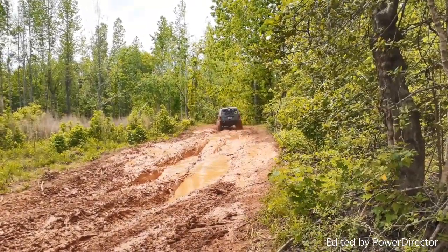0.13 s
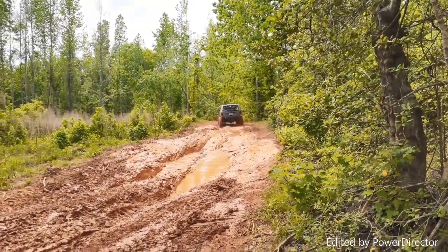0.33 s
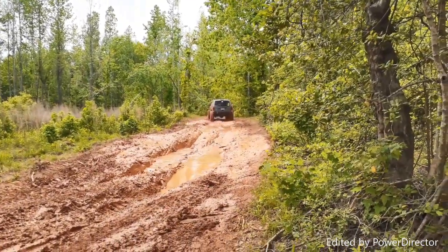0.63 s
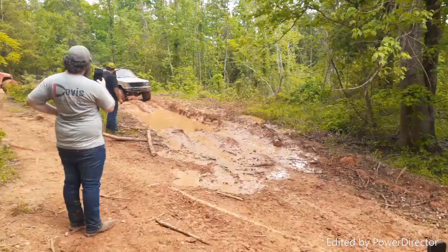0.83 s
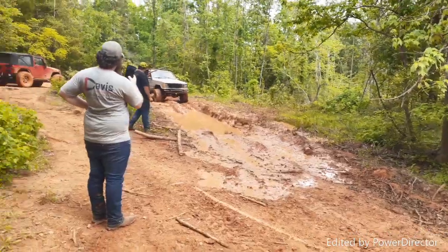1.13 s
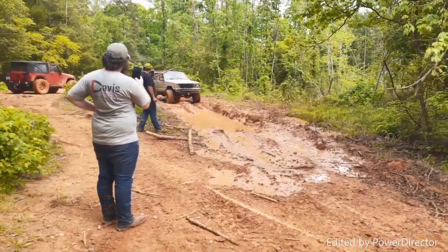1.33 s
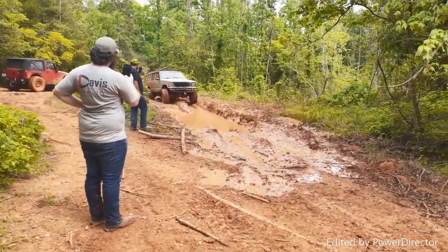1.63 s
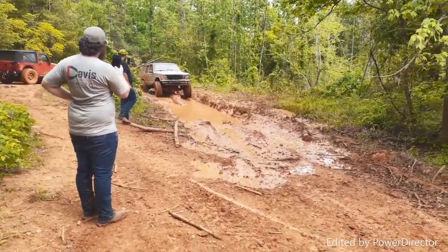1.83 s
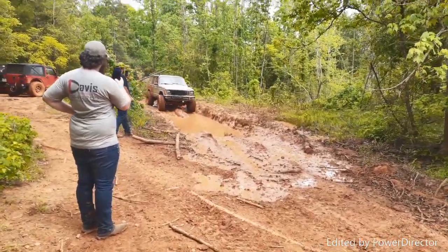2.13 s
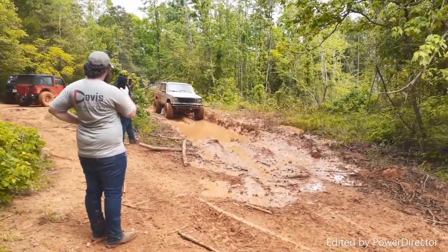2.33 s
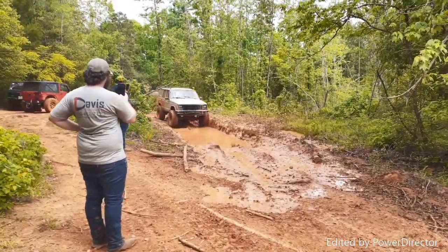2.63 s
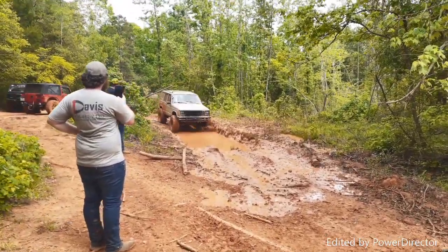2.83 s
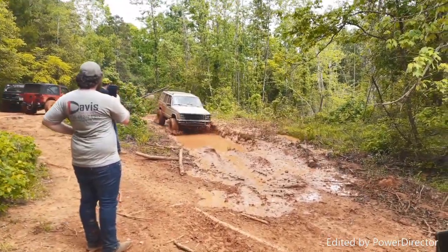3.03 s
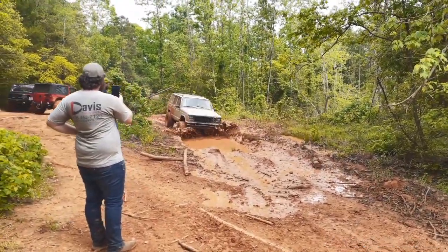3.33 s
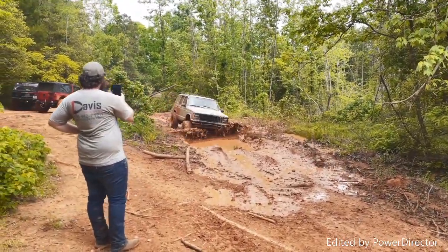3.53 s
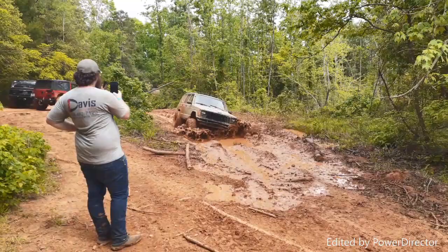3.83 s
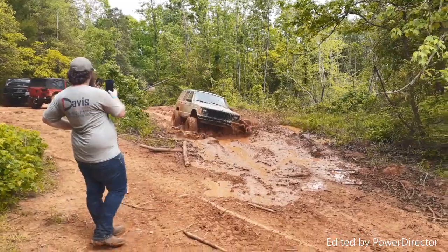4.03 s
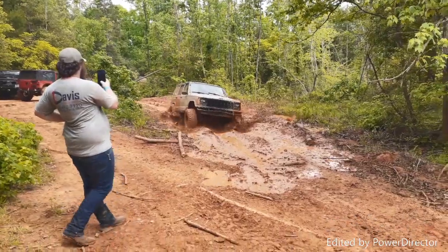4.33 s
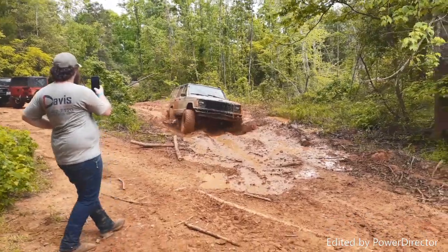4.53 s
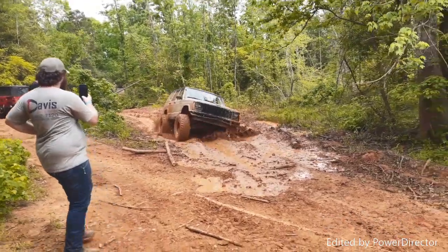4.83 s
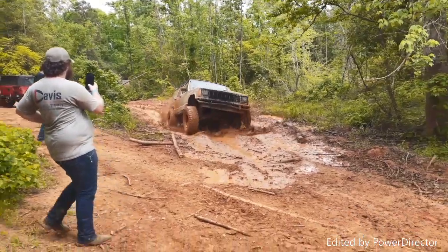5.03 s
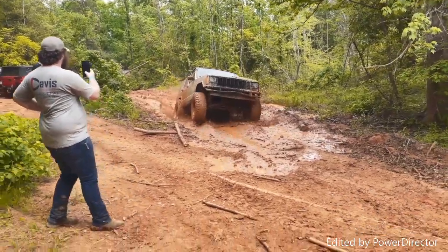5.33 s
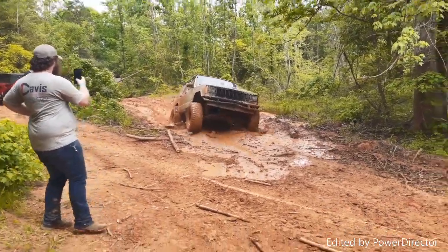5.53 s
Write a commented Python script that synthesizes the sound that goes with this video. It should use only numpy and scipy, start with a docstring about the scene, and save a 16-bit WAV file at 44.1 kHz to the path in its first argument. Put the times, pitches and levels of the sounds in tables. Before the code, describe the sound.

A distant off-road vehicle drones briefly, then after a short silence a nearby six-cylinder engine rumbles low, revs hard through wet mud and lets off.

```python
"""A far-off four-wheel drive grumbles on a forest track: a wavering drone, a dull roar and a thin hiss. The
sound cuts off for a moment and the scene changes: now it is near, rolls at low revs into a mud hole, revs up,
holds, surges and lets off. The exhaust is built from harmonics of the firing rate plus a burble of six unequal
cylinders. The engine bay roars and howls in puffs of noise at each firing; the tyres spray and squeeze wet mud."""
import sys
import numpy as np
from scipy import signal
from scipy.fft import rfft, irfft, next_fast_len
from scipy.io import wavfile
from scipy.ndimage import uniform_filter1d, map_coordinates

SR = 44100
rng = np.random.default_rng(int(sys.argv[2]) if len(sys.argv) > 2 else 0)


def to_wav(s):
    """Save 16-bit WAV."""
    ch = np.atleast_2d(s).T  # columns
    pcm = np.round(np.clip(ch, -1, 1) * 32767)  # PCM
    wavfile.write(sys.argv[1], SR, pcm.astype(np.int16))


N = 250488
TIME = np.arange(N) / SR


def amp(db):
    """Decibels to gain."""
    return 10 ** (np.asarray(db) / 20)


def unit(x):
    """Scale to rms 1."""
    return x / np.sqrt(np.mean(x ** 2) + 1e-20)


def along(points, hz):
    """Read (f/Hz, value) points on a log frequency axis."""
    f, value = np.transpose(points)
    return np.interp(np.log(hz + 1), np.log(f + 1), value)


def curves(rows):
    """One value per sample for each column after the time."""
    s, *columns = np.transpose(rows)
    return [np.interp(TIME, s, column) for column in columns]


def wobble(rate):
    """A smooth random curve, rate knots a second."""
    knots = rng.standard_normal(int(N * rate / SR) + 4)
    return map_coordinates(knots, [TIME * rate])


def filtered(x, response):
    """x times a complex response of frequency."""
    m = next_fast_len(N + SR // 2)
    hz = np.fft.rfftfreq(m, 1 / SR)
    return irfft(rfft(x, m) * response(hz), m)[..., :N]


def turbulence(patchy_db):
    """Rushing gas or water: two noises with patches of random gain in time and frequency; rms 1."""
    z = signal.stft(rng.standard_normal((2, N)), nperseg=512)[2]
    field = rng.standard_normal(z.shape[1:])
    field = uniform_filter1d(field, size=4, axis=0)
    field = uniform_filter1d(field, size=12, axis=1)
    noise = signal.istft(z * amp(patchy_db * unit(field)), nperseg=512)[1]
    return unit(noise[:, :N])


# left-right likeness, bass alike and treble apart: f/Hz, correlation [0 to 1]
STEREO_LIKENESS = [(100, .99), (500, 0.89), (1000, 0.78), (2000, 0.68), (4000, 0.34), (14000, 0.19)]


def spread(pair, colour):
    """Colour two unrelated signals and blend them to stereo: bass alike, treble apart; rms 1."""
    def mid_side(hz):
        turn = np.arccos(np.clip(along(STEREO_LIKENESS, hz), -1, 1)) / 2
        return amp(along(colour, hz)) * np.array([np.cos(turn), np.sin(turn)])
    mid, side = filtered(pair, mid_side)
    return unit(np.array([mid + side, mid - side]))


# one row per cylinder in firing order: excess strength of its exhaust pulse [ratio], clatter level/dB
CYLINDERS = [(0.35, 4), (-0.32, 5), (0.55, 3.9), (0.38, 3.5), (-0.019, 5.7), (-0.47, 5.5)]
PUFF_DB = 5.5  # how far the gas noise sinks between two firings


def puffs(firings):
    """A gain that jumps at each firing and sinks until the next, different for each cylinder; rms 1."""
    cylinder = firings.astype(int) % len(CYLINDERS)
    clatter_db = np.transpose(CYLINDERS)[1][cylinder]
    return unit(amp(clatter_db - PUFF_DB * (firings % 1)))


def uneven_pulses(firings, firing_hz, scatter):
    """How far each exhaust pulse departs from the mean: a pattern of six cylinders plus chance."""
    at = np.flatnonzero(np.diff(np.floor(firings)))
    excess = np.transpose(CYLINDERS)[0]
    pattern = np.resize(excess - excess.mean(), len(at))
    chance = scatter * rng.standard_normal(N // 100)[:len(at)]
    pulses = np.zeros(N)
    pulses[at] = pattern + chance
    return pulses / np.sqrt(firing_hz)


# the distant vehicle before the layer trims: t/s, rumble level/dB, roar level/dB, hiss level/dB
FAR_LEVELS = [(0.0, -35, -38, -43.5), (0.214, -37.5, -39, -46.5), (0.61, -36, -38.5, -53.5)]
# colours of its rumble and its roar: f/Hz, level/dB
FAR_RUMBLE = [(20, -29), (38, -11), (62, -8), (85, 2.5), (115, -4), (200, -6.5), (290, -7), (400, -20.5),
              (700, -51.5)]
FAR_ROAR = [(200, -8), (420, 2.5), (640, 7), (860, -4.5), (1060, 5), (1350, -4), (1600, -1), (2700, -6.5),
            (3500, -13), (6000, -19.5), (10000, -54)]
# colour of the hiss, shared with the near mud spray: f/Hz, level/dB
SPRAY = [(1000, 2), (3000, 1), (5000, -0.5), (7200, -2.5), (8500, 1.5), (10000, 0), (12300, 1.5),
         (14000, -2.5), (15800, -6.5)]


def distant_vehicle(drone_hz=73, surge_s=0.574):
    """Far off, the firings smear into a wavering drone, a rumble and a dull roar under a thin hiss."""
    rumble_db, roar_db, hiss_db = curves(FAR_LEVELS)
    firings = np.cumsum(drone_hz * (1 + 0.05 * wobble(8))) / SR
    # a brief dab of throttle swells the fundamental
    dab = np.exp(-((TIME - surge_s) / 0.027) ** 2)
    surge = amp(3.5 + 8.5 * dab)
    drone = surge * np.sin(2 * np.pi * firings) + amp(-1.0) * np.sin(4 * np.pi * firings)
    rumble = drone + amp(4.0) * spread(turbulence(patchy_db=1.0) * puffs(firings), FAR_RUMBLE)
    roar = spread(turbulence(patchy_db=1.5) * puffs(firings), FAR_ROAR)
    hiss = spread(turbulence(patchy_db=0.5), SPRAY)
    return amp(rumble_db) * rumble + amp(roar_db + 1) * roar + amp(hiss_db + 7.5) * hiss


# exhaust pipe's gain on each harmonic at full load, booming near 105 Hz: f/Hz, level/dB
PIPE = [(55, -24), (80, -13.5), (105, -10.5), (122, -11), (150, -20.5), (175, -30.5), (195, -24),
        (212, -24.5), (228, -40), (245, -25.5), (283, -27.5), (300, -35), (322, -36.5), (350, -24.5),
        (380, -26), (420, -38.5), (450, -32.5), (480, -34.5), (560, -76), (620, -39), (670, -35),
        (760, -52), (1100, -61), (1600, -69)]
# colour of the muffler's drone, before DRONE_DB: f/Hz, level/dB
DRONE = [(140, -12), (165, 2.5), (195, 2), (220, -45), (290, -28), (330, -13.5), (360, -22), (400, -51),
         (570, -27), (635, -21), (720, -33.5), (800, -39)]
# at low revs the muffler drones on the upper harmonics, up to this firing rate, fading over this width
DRONE_DB, DRONE_TOP_HZ, DRONE_FADE_HZ = -28.5, 68.7, 3.2
# the upper harmonics open up with the throttle: dB per dB, around this throttle in dB
BLARE_SLOPE, BLARE_PIVOT_DB = 0.22, 4.5


def exhaust_note(firings, firing_hz, load_db, throttle_db, waver_db=0.81, lag=0.79):
    """Harmonics of the firing rate slide through the pipe's resonances; at low revs the muffler drones."""
    low_revs = 1 / (1 + np.exp((firing_hz - DRONE_TOP_HZ) / DRONE_FADE_HZ))
    blare_db = BLARE_SLOPE * (throttle_db - BLARE_PIVOT_DB)
    note = np.zeros(N)
    for k in range(1, 15):
        upper = k >= 3
        hz = k * firing_hz
        harmonic_waver_db = waver_db * min(k - 1, 4) * wobble(16)
        pipe_db = along(PIPE, hz) + load_db + upper * blare_db + harmonic_waver_db
        drone_db = along(DRONE, hz) + DRONE_DB + 2.4 * wobble(14.3)
        gain = amp(pipe_db) + upper * low_revs * amp(drone_db)
        # higher harmonics lag: the pipe smears each pulse
        phase = 2 * np.pi * k * firings - lag * (k - 1) ** 2
        note -= np.sqrt(2) * gain * np.cos(phase)
    return note


def ring(x, colour, size=8192):
    """Send x through a causal, minimum-phase body with this colour; rms 1."""
    hz = np.fft.rfftfreq(size, 1 / SR)
    gain = amp(along(colour, hz)) / (1 + (hz / colour[-1][0]) ** 2)
    # folding the cepstrum makes the response causal
    cepstrum = irfft(np.log(gain))
    cepstrum[1:size // 2] *= 2
    cepstrum[size // 2 + 1:] = 0
    impulse = irfft(np.exp(rfft(cepstrum)))
    return unit(signal.fftconvolve(x, impulse)[:N])


# lumpy at low revs, smooth in the middle, growling at the top: firing rate f/Hz, burble level/dB,
# growl level/dB at full load, rasp level/dB at wide-open throttle
ROUGHNESS = [(55, -33, -35, -31.5), (66.2, -28.5, -35, -29.5), (80, -28.5, -35.5, -30.5),
             (93, -34.5, -38.5, -29.5), (98.7, -35, -37, -29), (107.1, -32, -36, -31.5),
             (113.7, -31.5, -27, -31.5), (121.2, -28, -26.5, -26), (126.8, -31, -29.5, -33),
             (138.5, -26, -25, -23)]


def at_speed(firing_hz):
    """Burble, growl and rasp levels at this firing rate."""
    hz, *columns = np.transpose(ROUGHNESS)
    return [np.interp(firing_hz, hz, column) for column in columns]


# colours of the muffler's burble and the tailpipe's growl: f/Hz, level/dB
MUFFLER = [(20, -70.5), (45, -7), (64, -18), (78, 6.5), (110, 1), (145, -2), (185, 6.5), (215, -14),
           (260, -10), (480, -50), (900, -70.5)]
TAILPIPE = [(100, -53.5), (190, -8), (250, -1.5), (300, 3.5), (345, 0.5), (400, -3.5), (490, -0.5),
            (560, -20.5), (640, -25), (800, -14), (1500, -51)]


def exhaust_burble(firings, firing_hz, burble_db, growl_db):
    """Unequal cylinders fill the gaps between harmonics: muffler burble and, at high revs, tailpipe growl."""
    muffler = ring(uneven_pulses(firings, firing_hz, scatter=.25), MUFFLER)
    gas = turbulence(patchy_db=0)[0] * puffs(firings)
    pulses = unit(uneven_pulses(firings, firing_hz, scatter=.3))
    tailpipe = ring(pulses + .7 * gas, TAILPIPE)
    return amp(burble_db) * muffler + amp(growl_db) * tailpipe


# lines halfway between the harmonics, relative to the growl: f/Hz, level/dB
HALF_ORDERS = [(150, -22), (190, -6), (235, -9), (295, -6.5), (340, -6.5), (410, -12), (450, -8.5),
               (520, -12), (590, -12.5), (660, -23), (750, -12.5), (1000, -29)]


def strain(firings, firing_hz, growl_db, waver_db=2.5):
    """Under strain every other firing is stronger, which sounds lines halfway between the harmonics."""
    total = np.zeros(N)
    for k in np.arange(1.5, 8):
        level_db = growl_db + along(HALF_ORDERS, k * firing_hz) + waver_db * wobble(15)
        phase = 2 * np.pi * (k * firings + rng.random()) + 0.5 * wobble(12)
        total += amp(level_db) * np.sqrt(2) * np.sin(phase)
    return total


def knocks(firings, firing_hz, t60=0.084):
    """Uneven firing pulses, smeared by reflections between the chassis and the ground; rms 1."""
    t = TIME[:SR // 10]
    reflections = rng.standard_normal(len(t)) * amp(-60 * t / t60)
    pulses = uneven_pulses(firings, firing_hz, scatter=0.2)
    return unit(signal.fftconvolve(pulses, reflections)[:N])


# colours of the pipe's rasp and the engine bay's roar: f/Hz, level/dB
RASP = [(150, -54), (350, -11.5), (520, 0.5), (640, 1), (770, -10), (880, -8.5), (1050, -9), (1400, -12),
        (3000, -39)]
ROAR = [(400, -16), (800, 3), (1100, -2), (1550, 0.5), (1800, 2), (2020, -1.5), (2400, -1), (2900, -4.5),
        (3250, -7.5), (4500, -8), (6000, -16), (9000, -27.5)]


def engine_roar(firings, firing_hz, rasp_db, roar_db):
    """Gas rasps out of the pipe and the engine bay roars, both in puffs at the firing rate."""
    rasp = spread(turbulence(patchy_db=4.0) * puffs(firings), RASP)
    roar = spread(turbulence(patchy_db=3.0) * puffs(firings), ROAR)
    # each firing also knocks the pipe and the block, which draws fine lines in the noise
    rasp = amp(-0.5) * rasp + amp(-8) * ring(knocks(firings, firing_hz), RASP)
    roar = roar + amp(-6.5) * ring(knocks(firings, firing_hz), ROAR)
    return amp(rasp_db) * rasp + amp(roar_db + 0.22 * wobble(23.74)) * roar


def resonate(x, modes):
    """Ring a set of (f/Hz, width/Hz, level/dB) resonances; rms 1."""
    def body(f):
        return sum(amp(db) * 1j * f * w / (c * c - f * f + 1j * f * w) for c, w, db in modes)
    return unit(filtered(x, body))


# intake and engine bay resonances, nose down in the hole and nose up out of it: f/Hz, width/Hz, level/dB
NOSE_DOWN = [(640, 31, -11.5), (1030, 66, 5.5), (1397, 36, -1.5), (1790, 58, -22.5), (2330, 76, 1.5),
             (2830, 160, -4.5)]
NOSE_UP = [(433, 52, 6), (720, 160, 1), (973, 29, 3.5), (1740, 60, -14.5), (2730, 110, -1), (3020, 170, -8)]


def intake_howl(firings, firing_hz, howl_db, crest_s=3.56):
    """Gulps of air ring the engine bay, whose colour changes as the nose climbs out of the hole."""
    gulps = knocks(firings, firing_hz) + amp(2.0) * turbulence(patchy_db=-4.5) * puffs(firings)
    raised = np.clip(TIME - crest_s + .5, 0, 1)  # one-second crossfade centred on the crest
    howl = (1 - raised) * resonate(gulps, NOSE_DOWN) + raised * resonate(gulps, NOSE_UP)
    return amp(howl_db) * howl


def droplets(per_second, scatter_db, life):
    """Two streams of tiny noisy splats of uneven size, each dying away over life seconds; rms 1."""
    size_db = scatter_db * np.minimum(rng.standard_normal((2, N)), 2)
    hits = (rng.random((2, N)) < per_second / SR) * amp(size_db)
    energy = signal.lfilter([1], [1, -np.exp(-1 / (life * SR))], hits ** 2)
    return unit(np.sqrt(energy) * rng.standard_normal((2, N)))


# spray gain at wide-open throttle before the plunge, and dB lost per dB of throttle
SPRAY_DB, SPRAY_SLOPE = -38, 0.67
# the wheels plunge into the puddle and throw more spray: from when, over how long, gain
PLUNGE_S, PLUNGE_RISE_S, PLUNGE_DB = 2.9, 0.58, 5.5


def mud_spray(throttle_db):
    """Spinning tyres fling muddy water: a hiss full of small splats, stronger once they are in the puddle."""
    plunged = np.clip((TIME - PLUNGE_S) / PLUNGE_RISE_S, 0, 1)
    spray_db = SPRAY_DB + SPRAY_SLOPE * throttle_db + PLUNGE_DB * plunged
    splats = droplets(per_second=540, scatter_db=-0.5, life=0.0015)
    wet = turbulence(patchy_db=1.5) + amp(-3.0) * splats
    return amp(spray_db + 1.1 * wobble(33)) * spread(wet, SPRAY)


# mud squeezed out from under the tyres: t/s, level/dB, centre f/Hz
SQUELCHES = [(1.495, -41, 1400), (1.525, -42, 2220), (1.595, -42, 2190), (2.15, -45, 2250),
             (2.325, -38, 2440), (2.4, -31.5, 1040), (2.49, -32, 1077), (2.6, -29.5, 1870)]


def squelches(width_s=0.01, sharpness=5):
    """Short gritty swells as a tyre squeezes a pocket of wet mud."""
    splats = droplets(per_second=700, scatter_db=3, life=.001)[0]
    grit = turbulence(patchy_db=1)[0] + .5 * splats

    def pocket(hz):
        return unit(filtered(grit, lambda f: 1 / (1 + (sharpness * np.log((f + 1) / hz)) ** 2) ** 2))

    total = np.zeros(N)
    for s, db, hz in SQUELCHES:
        swell = np.exp(-((TIME - s) / width_s) ** 2)
        total += amp(db) * swell * pocket(hz)
    return total


# echo of the trees: f/Hz, decay t60/s
FOREST = [(150, 0.31), (10000, 0.16)]


def forest(x):
    """The trees scatter a short, soft echo, different on each side."""
    hz, t, z = signal.stft(rng.standard_normal((2, SR // 2)), SR, nperseg=256)
    decay = amp(-60 * t / along(FOREST, hz)[:, None])
    tail = signal.istft(z * decay, SR, nperseg=256)[1]
    return signal.fftconvolve(x, tail / np.linalg.norm(tail[0]), axes=1)[:, :N]


# engine speed: t/s, firing rate f/Hz
SPEED = [(0.91, 66.5), (1.33, 58.34), (1.89, 55.4), (2.1, 52.8), (2.17, 56.13), (2.41, 75.75), (2.53, 83.8),
         (2.66, 89.24), (2.85, 95.2), (3.21, 87.98), (3.77, 107.2), (3.99, 101.5), (4.36, 116.8),
         (4.88, 125.5), (5.12, 136.4), (5.17, 135.9), (5.27, 116.3), (5.35, 96.1), (5.52, 74.7),
         (5.68, 81.44)]
# how hard the engine pulls, as exhaust pulse strength: t/s, level/dB relative to full load
LOAD = [(0.91, -15.5), (1.4, -16), (2.25, -14.5), (2.5, -5.5), (2.78, 1.5), (3.15, -4.5), (3.45, 0.5),
        (4.1, 0.4), (4.95, -3.5), (5.2, -2.7), (5.29, -20), (5.36, -10.5), (5.52, -14), (5.68, -8)]
# throttle, as the effort heard at the engine bay: t/s, level/dB relative to wide open
THROTTLE = [(0.91, -18.1), (1.33, -18), (1.5, -13.5), (2.08, -14.5), (2.5, -1.4), (2.85, -4.5),
            (3.15, -10.5), (3.55, -6), (3.98, -12), (4.3, -12), (4.68, -10.5), (4.97, 2), (5.14, -0.4),
            (5.26, -10.5), (5.55, -14), (5.68, -5)]
# gain at wide-open throttle, and dB lost per dB of throttle
ROAR_DB, ROAR_SLOPE = -32, 0.87
HOWL_DB, HOWL_SLOPE = -30, 1.56
RASP_SLOPE = 0.78
GROWL_SLOPE = 0.59  # the growl follows the load, dB per dB
BREAK_START_S, BREAK_END_S, FADE_IN_S = 0.622, 0.905, .002


def scene(lag_ms=0.064):
    """The distant vehicle, a brief silent cut, then a new scene: the run through the mud a little to the left."""
    (firing_hz,), (load_db,), (throttle_db,) = curves(SPEED), curves(LOAD), curves(THROTTLE)
    firings = np.cumsum(firing_hz) / SR
    burble_db, growl_db, rasp_db = at_speed(firing_hz)
    growl_db = growl_db + GROWL_SLOPE * load_db
    rasp_db = rasp_db + RASP_SLOPE * throttle_db
    roar_db = ROAR_DB + ROAR_SLOPE * throttle_db
    howl_db = HOWL_DB + HOWL_SLOPE * throttle_db

    far = distant_vehicle()
    exhaust = exhaust_note(firings, firing_hz, load_db, throttle_db)
    exhaust = exhaust + exhaust_burble(firings, firing_hz, burble_db, growl_db)
    exhaust = exhaust + strain(firings, firing_hz, growl_db)
    rough = engine_roar(firings, firing_hz, rasp_db, roar_db)
    rough = rough + intake_howl(firings, firing_hz, howl_db)
    rough = rough + mud_spray(throttle_db) + squelches()

    # left is slightly louder, and the sound reaches the right slightly later
    near = (exhaust + rough + amp(-15.0) * forest(rough)) * amp([[.25], [-.25]])
    near = filtered(near, lambda hz: np.exp(-2j * np.pi * np.outer([0, lag_ms / 1000], hz)))
    fade_in = np.clip((TIME - BREAK_END_S) / FADE_IN_S, 0, 1)
    return far * (TIME < BREAK_START_S) + near * fade_in


TOP_HZ = 15850


def record(dry):
    """A steep low-pass: nothing is kept above the band limit."""
    return filtered(dry, lambda hz: hz < TOP_HZ)


dry = scene()
out = record(dry)
to_wav(out)
```